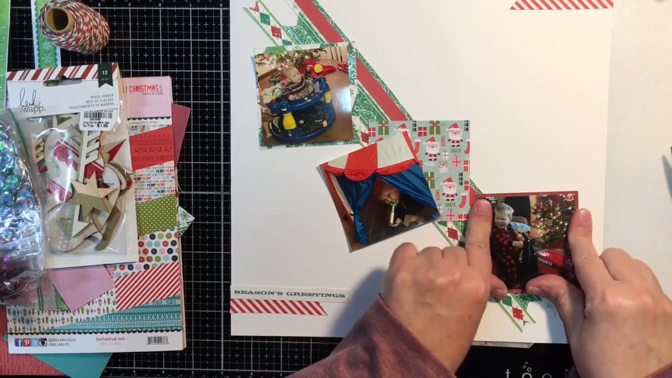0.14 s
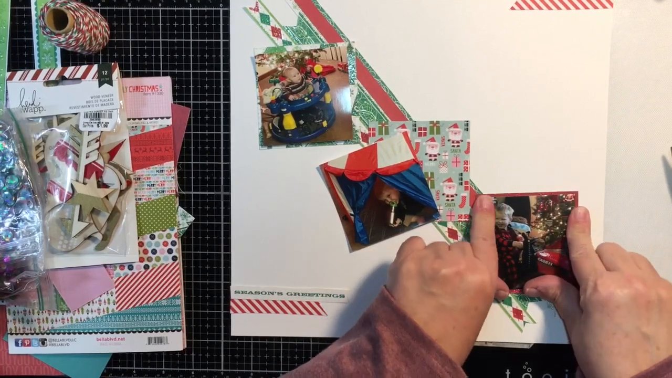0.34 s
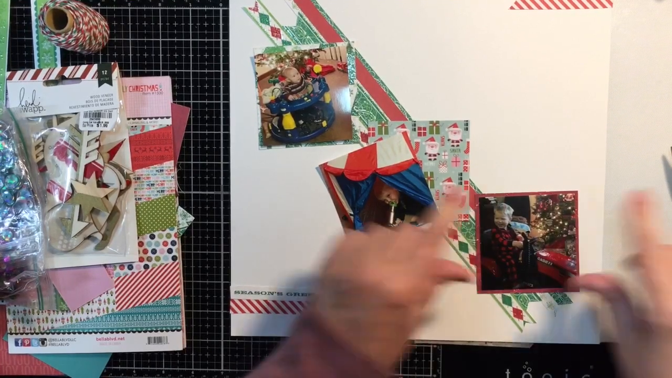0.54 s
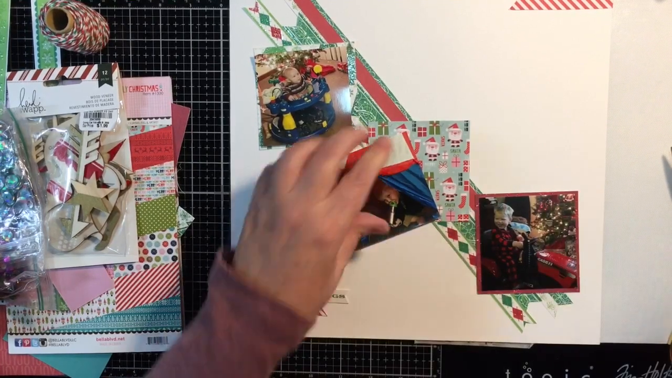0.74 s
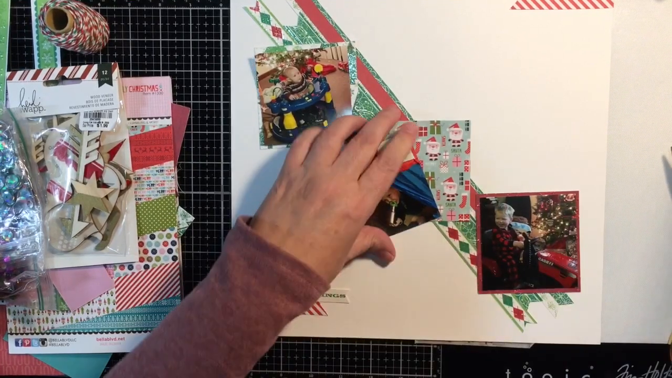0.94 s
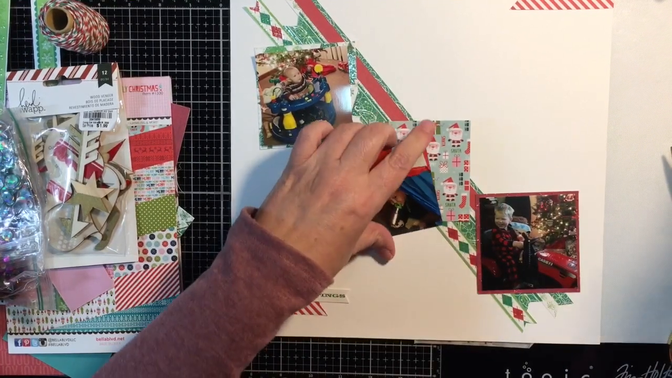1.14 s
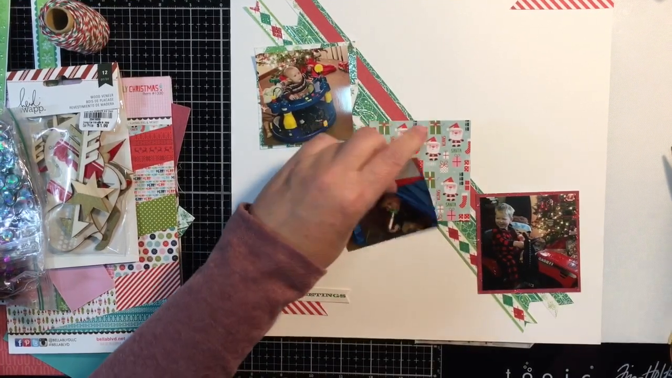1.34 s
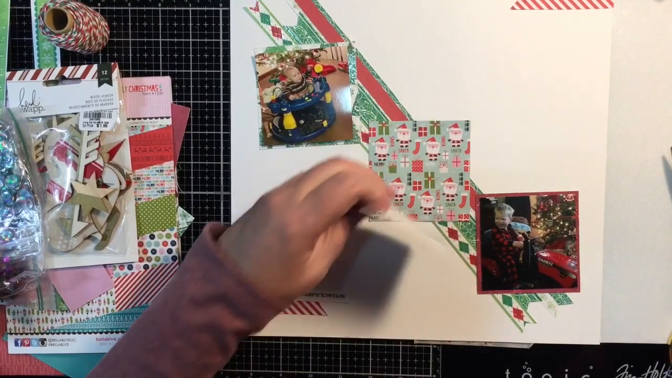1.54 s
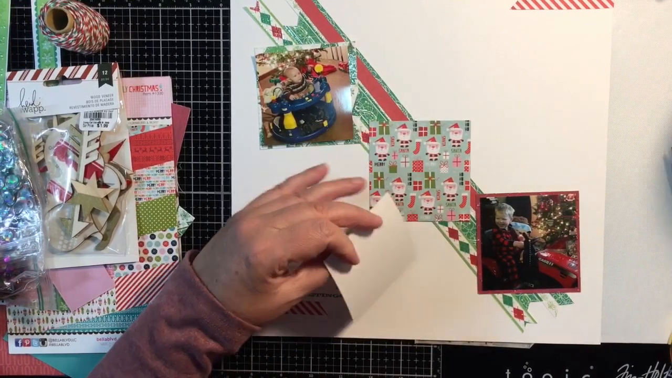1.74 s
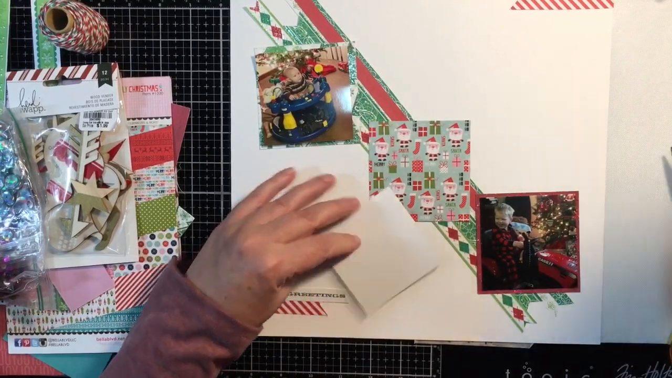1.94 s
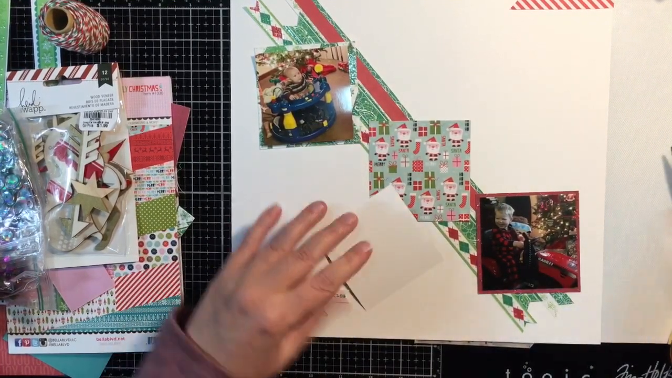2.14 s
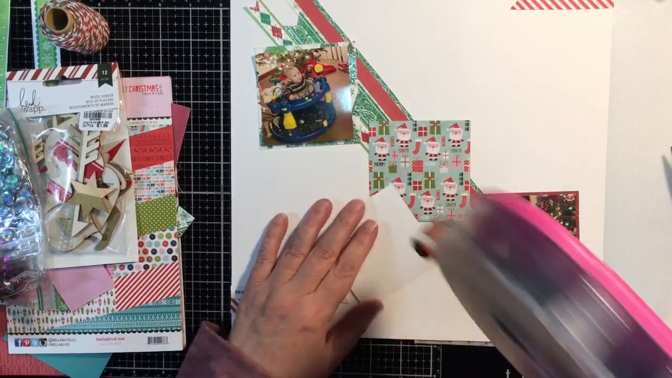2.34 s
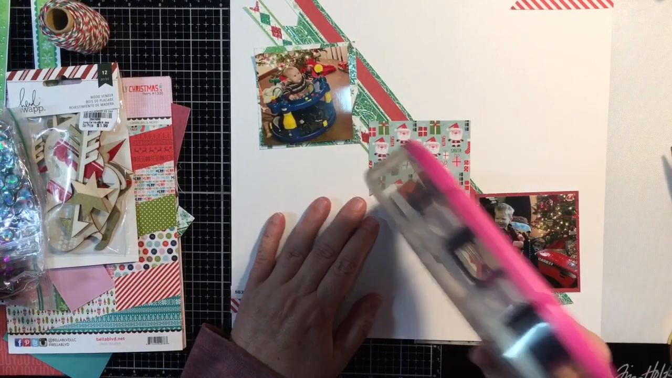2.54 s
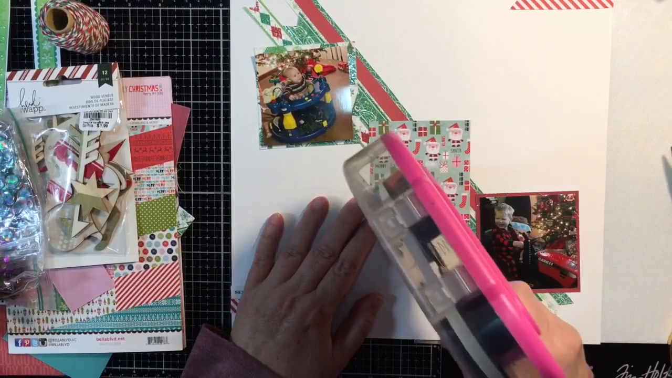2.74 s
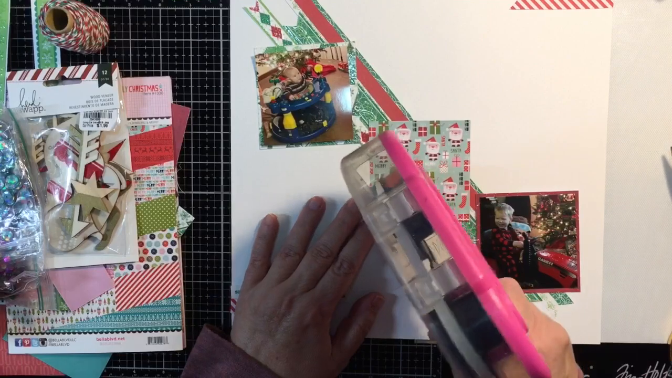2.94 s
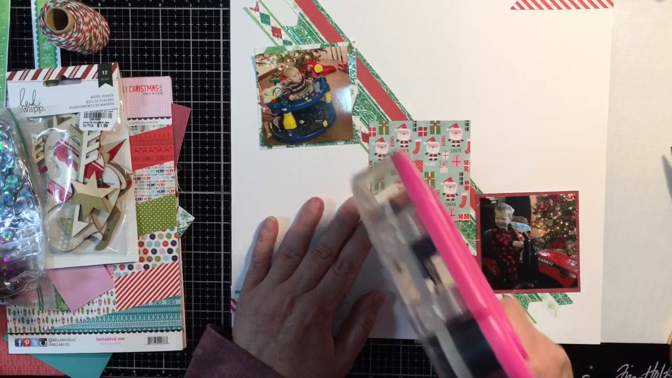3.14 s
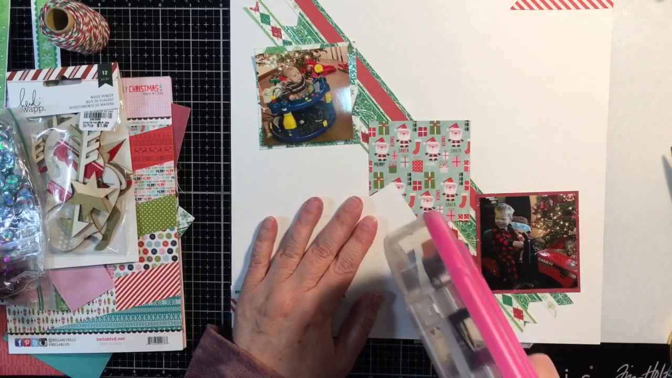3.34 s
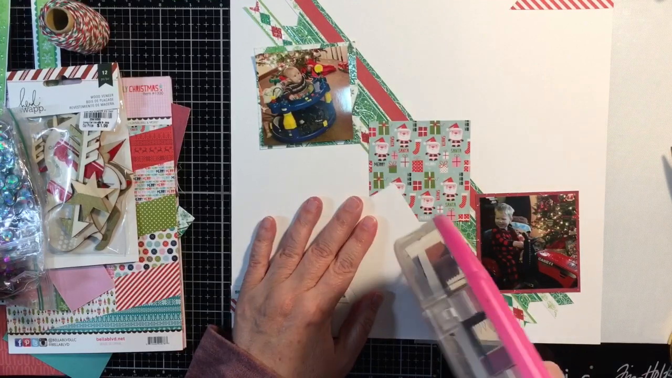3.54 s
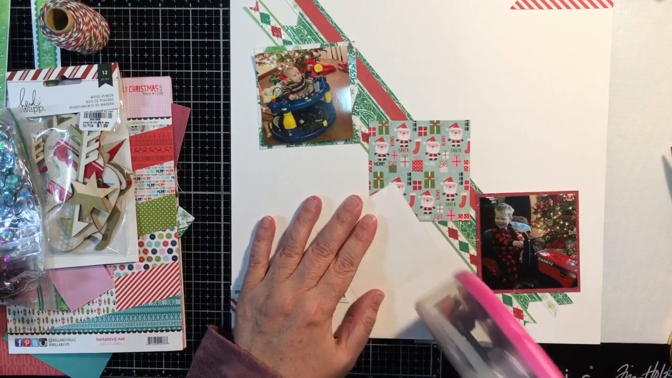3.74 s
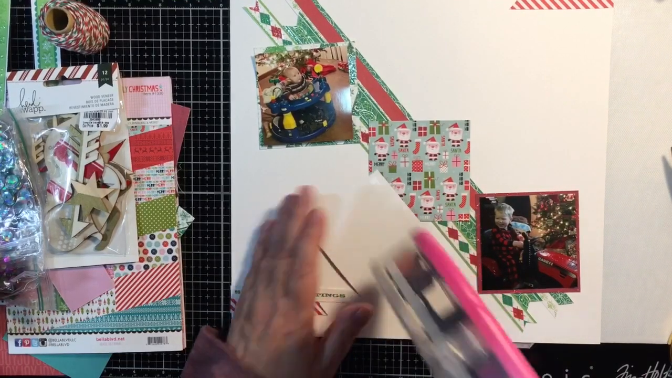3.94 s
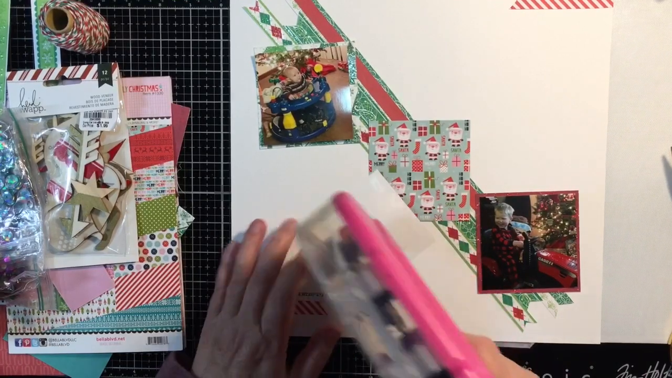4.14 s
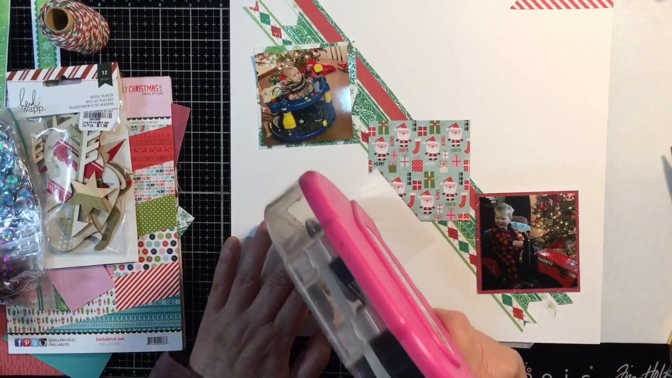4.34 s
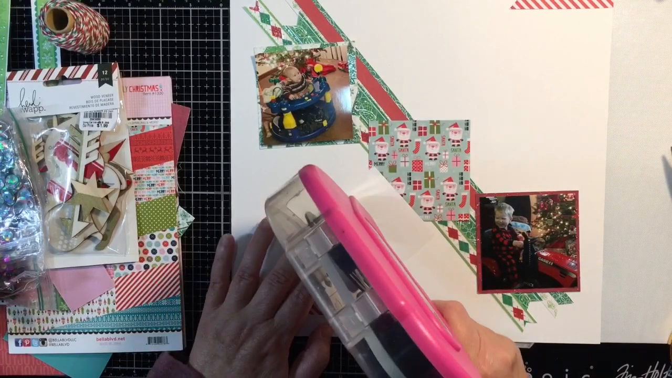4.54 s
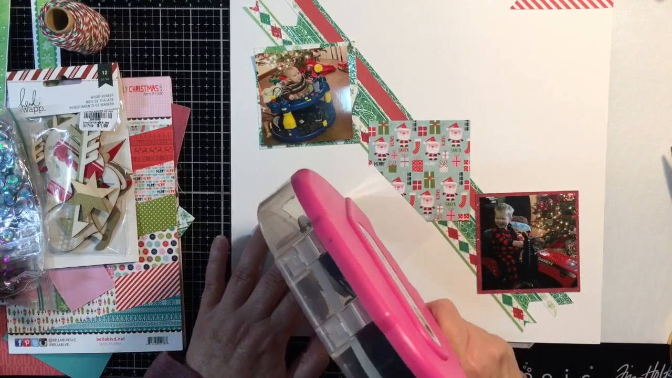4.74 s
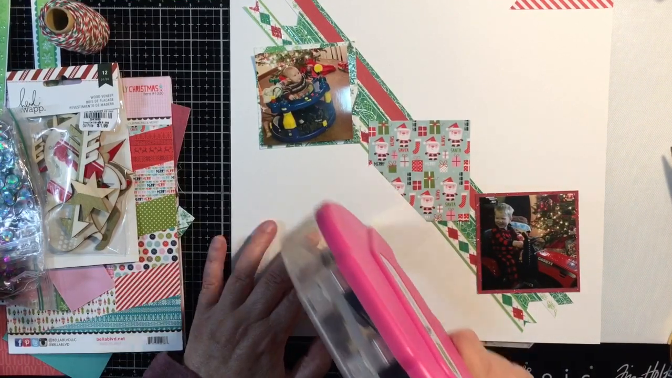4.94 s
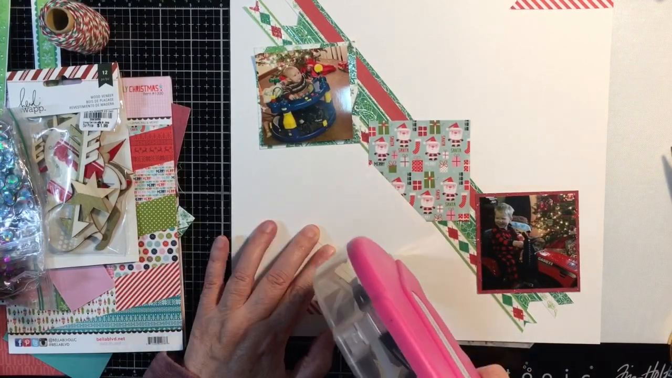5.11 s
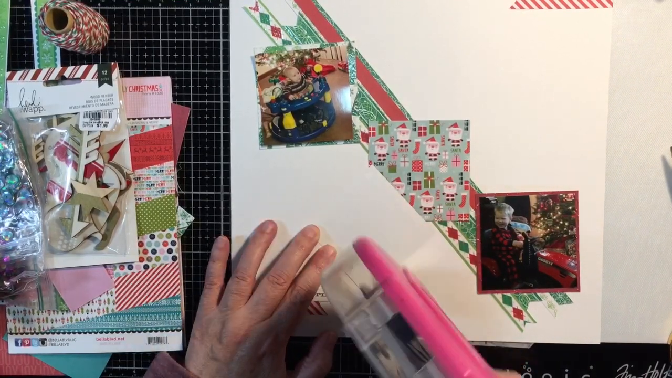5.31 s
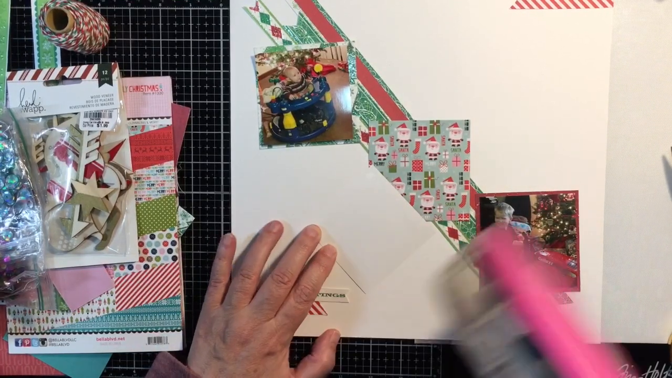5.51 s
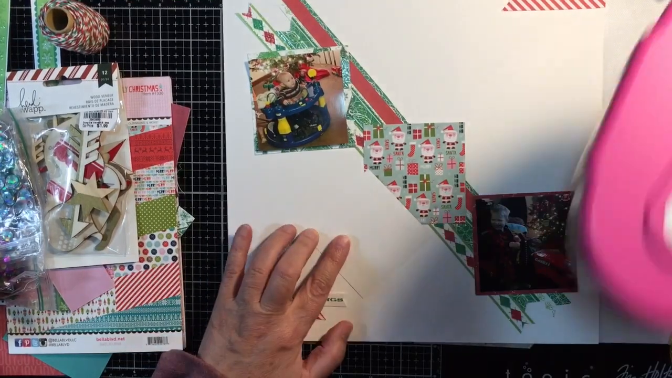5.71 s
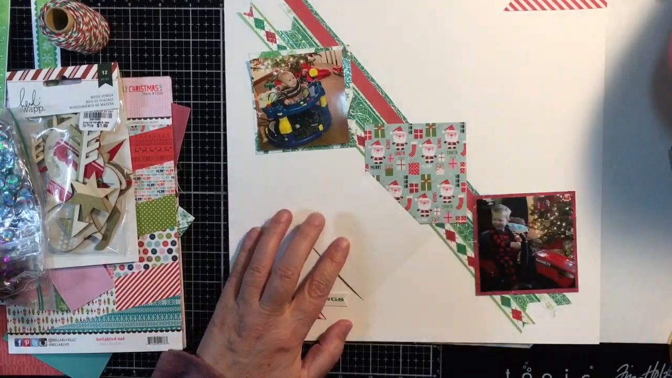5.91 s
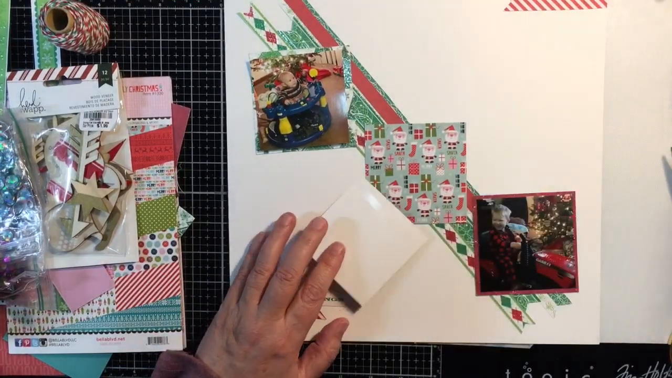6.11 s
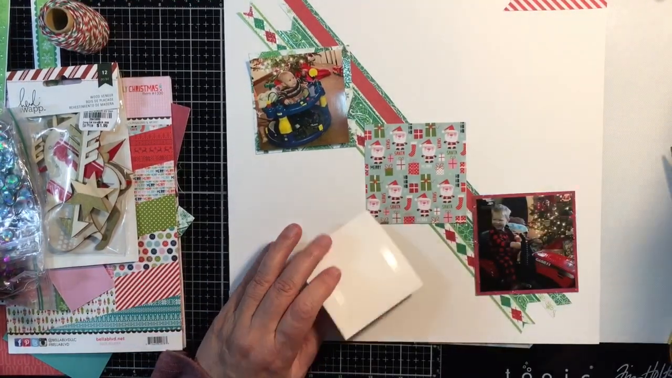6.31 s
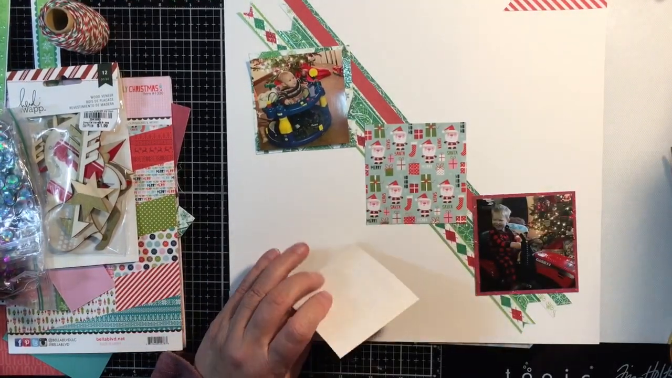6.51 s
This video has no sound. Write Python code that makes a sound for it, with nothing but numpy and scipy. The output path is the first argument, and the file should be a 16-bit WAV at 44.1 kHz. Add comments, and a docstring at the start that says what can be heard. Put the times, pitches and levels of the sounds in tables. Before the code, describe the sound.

Dry papery rubs and small flicks come first, over a faint low room hum. Then a plastic adhesive dispenser clatters onto paper, its reels juddering in a brief rasp, with hard knocks at the end. Another loud knock starts a shorter, weaker rasp that finishes with a springy click. Quiet handling leads to one heavy clunk on the tabletop. Close microphone, small room, short reverberation.

```python
"""A plastic tape runner knocks and is drawn across paper twice; its trigger snaps and it lands on the table.
Reels are random slips through case resonances, tape is hiss and ticks; blows are short noise bursts in modes.
A photo slides, flicks and taps on the page: fibre slips follow hand speed, and contacts ring the paper.
Low decaying sines shake the table top; finger rubs, echoes, a small room and steady air noise surround it."""
import sys
import numpy as np
from scipy import signal
from scipy.fft import rfft, irfft
from scipy.io import wavfile
from scipy.ndimage import uniform_filter1d

SR = 44100
rng = np.random.default_rng(int(sys.argv[2]) if len(sys.argv) > 2 else 0)


def generate_wav(sig):
    """Save sig (samples, or channels by samples) to the path in sys.argv[1] as 16-bit PCM at SR."""
    pcm = np.round(np.clip(np.atleast_2d(sig).T, -1, 1) * 32767).astype(np.int16)
    wavfile.write(sys.argv[1], SR, pcm)


N = 294147
TIME = np.arange(N) / SR
HZ = np.fft.rfftfreq(8192, 1 / SR)

# All level_db are source levels ahead of the mix; spectra are relative and get normalised.

# runner strokes: start_s, length_s, rumble_db, peel_db, swell_power (low = even, high = peaked)
STROKES = [(3.066, 0.469, -37, -48.5, 2.5), (4.892, 0.3, -39.5, -51.5, .7)]
# thickest adhesive threads snap: start_s, level_db
THREAD_SNAPS = [(3.236, -54), (3.352, -38), (3.448, -50.5), (3.471, -57.5)]
# reel spectrum: freq_hz, level_db
REEL_SPECTRUM = [(100, -32.5), (250, -18.5), (400, -8.5), (530, -1), (680, -2.5), (1000, -6), (1200, -2),
                 (1500, -18.5), (3100, -13.5), (5000, -26), (12000, -48.5)]
# loaded reel resonances, one list per stroke: freq_hz, width_hz, lift_db
REEL_MODES = [
    [(734, 340, -7), (1160, 480, 3), (2250, 780, 0.5)],
    [(503, 780, 8.5), (1743, 300, 8.5), (3110, 1700, 4.5)],
]
# plastic case resonances: freq_hz, width_hz, lift_db
CASE_MODES = [(483.7, 3.9, 7.5), (629, 47, 11.5), (842, 63, 5), (1180, 92, 1.5), (1517, 79, 1),
              (1855, 130, 3.5), (2290, 51, 2), (2880, 34, 11.5), (3613, 50, -5), (3840, 110, 3),
              (3985, 55, 5.5), (4474, 80, 0.5), (6740, 140, 1)]
# peeling tape spectrum: freq_hz, level_db
TAPE_SPECTRUM = [(500, -5), (2000, 6), (3500, -3), (6000, 1.5), (10000, 1.5), (15000, 2)]
STROKE_PEAK = 0.63  # share of stroke length at top speed
SURGE_S, SURGE_DB = 0.0638, 1.4  # reels bind once per turn: period, depth
PEEL_POWER = 1.2  # peel amplitude = drag ** this


def tape_strokes():
    """Reels judder in the case as tape peels off its liner in fizz and ticks; both follow hand speed."""
    # glue lets go in uneven slips: each a puff of tiny snaps and a jolt to the reels
    slip_count = np.cumsum(75 * flutter(90, 4)) / SR
    slip_db = 4 * np.clip(rng.standard_normal(N), -2, 2)[slip_count.astype(int)]
    slip_decay = np.exp(-(slip_count % 1) / 0.26)
    slips = unit(0.2 + amp(slip_db) * slip_decay)

    reels, peel = np.zeros(N), np.zeros(N)
    for (start_s, length_s, rumble_db, peel_db, swell_power), reel_modes in zip(STROKES, REEL_MODES):
        t = TIME - start_s
        drag = hand_speed(t, length_s, STROKE_PEAK) ** swell_power
        surge_db = SURGE_DB * np.cos(2 * np.pi * t / SURGE_S)
        jolts = grains(3500, 2.3) * unit(np.sqrt(slips))
        judder = amp(rumble_db + surge_db) * drag * jolts
        reels += colour(judder, body(REEL_SPECTRUM, CASE_MODES + reel_modes))
        peel += amp(peel_db) * drag ** PEEL_POWER

    crackle = peel * grains(7000, 2) * slips
    for start_s, level_db in THREAD_SNAPS:
        add(crackle, start_s, amp(level_db) * chatter(hold_s=0.001, t60_s=0.015))
    tape = colour(crackle, body(TAPE_SPECTRUM))
    return wander(reels, depth_db=4.5) + wander(tape, depth_db=2.5)


# case and mechanism knocks: start_s, level_db, sharp_db (top end)
KNOCKS = [(2.660, -41.5, -14), (2.794, -55.5, 10.5), (2.911, -49.5, 5), (2.920, -35, -1), (3.109, -52.5, 7),
          (3.128, -41, -10), (3.188, -50.5, -22), (3.320, -40, 3), (3.431, -27, -10.5), (3.578, -24.5, -6),
          (3.676, -50, 18), (4.287, -66.5, -10), (4.370, -68.5, -8), (4.526, -57, 2), (4.618, -60, 22),
          (4.664, -24, -7), (4.779, -49, -22), (4.950, -48.5, -12), (5.264, -42.5, -2), (5.295, -53, 3),
          (5.503, -52.5, -5), (5.661, -34.5, -16)]
# case spectrum: freq_hz, level_db
CASE_SPECTRUM = [(100, -32.5), (270, -11), (550, -13), (900, -5.5), (1900, -3), (3000, -10), (5000, -17),
                 (8000, -28), (15000, -42)]
# lighter knocks sound more hollow: low end at FIRM_DB, gain per dB below it
FIRM_DB, FIRM_LOW_DB, HOLLOW_PER_DB = -26.5, 3.5, 0.3605


def case_knocks():
    """Case and mechanism parts strike each other and ring the plastic shell."""
    knocks = KNOCKS + rattles(spread_db=2.5, sharp_db=0)
    return blows(knocks, body(CASE_SPECTRUM, CASE_MODES), hold_s=0.0036, t60_s=0.028,
                 low_db=FIRM_LOW_DB, low_per_db=HOLLOW_PER_DB)


# loose parts as the runner is carried off: (start_s, end_s), level at start, fade
RATTLE_SPAN_S, RATTLE_DB, RATTLE_FADE_DB_PER_S = (5.86, 6.18), -56, 54


def rattles(spread_db, sharp_db, count=6):
    """Loose parts give faint knocks at uneven times, dying away."""
    start_s, end_s = RATTLE_SPAN_S
    when, strength = rng.random((count, 2)).T
    after_s = (end_s - start_s) * (np.arange(count) + when) / count
    level_db = RATTLE_DB - RATTLE_FADE_DB_PER_S * after_s + spread_db * (2 * strength - 1)
    return [(start_s + s, db, sharp_db) for s, db in zip(after_s, level_db)]


# trigger snaps back: start_s, level_db, sharp_db (top end)
TRIGGER_SNAPS = [(5.358, -47, -6.5), (5.369, -35, -1), (5.374, -17.5, 3.5), (5.782, -31.5, 1)]
# trigger spring spectrum: freq_hz, level_db
SPRING_SPECTRUM = [(100, -44.5), (200, -16.5), (300, -16), (550, -8.5), (900, -2.5), (1900, -3.5),
                   (3000, -4), (5000, -12), (8000, -16.5), (15000, -26)]
# trigger resonances: freq_hz, width_hz, lift_db
TRIGGER_MODES = [(486, 32, 8.1), (785, 28, 4.5), (1310, 63, 8.4), (1780, 130, 11), (2300, 70, 3),
                 (2280, 88, 4.7), (2680, 100, 6.3), (3700, 150, 8.7), (3550, 70, 3.2), (4110, 100, 5.4),
                 (4560, 100, 3), (6730, 500, 4.1)]


def trigger_snaps():
    """The sprung trigger strikes its stop; loose parts shift as it rings."""
    snaps = blows(TRIGGER_SNAPS, body(SPRING_SPECTRUM, TRIGGER_MODES), hold_s=0.0037, t60_s=0.032,
                  low_db=6, low_per_db=-0.07)
    return wander(snaps, depth_db=2)


# runner meets table, edge first, then whole weight: start_s, level_db, sharp_db (top end)
LANDINGS = [(6.385, -38.5, 1), (6.482, -15, 7)]
# table top spectrum: freq_hz, level_db
TABLE_SPECTRUM = [(30, -31), (60, -13), (150, 0), (280, -8.5), (500, -6), (1000, -6), (1800, -5.5),
                  (3000, -10), (5000, -21), (8000, -30), (15000, -43.5)]
# table top resonances: freq_hz, width_hz, lift_db
TABLE_MODES = [(381, 26, 9.6), (452, 29, 8.9), (656.4, 20, 12.4), (765, 20, 11.5), (1100, 30, 3.1),
               (1240, 57, 6.1), (1466, 73, 7.8), (1696, 88, 6.2), (1820, 53, 10), (2370, 39, 2.5),
               (2380, 83, 4.7), (2670, 67, 3.7), (3270, 90, 6.9)]


def table_landing():
    """The runner's weight strikes the table top and rings its modes."""
    hits = LANDINGS + bounces(sharp_db=1.5)
    return blows(hits, body(TABLE_SPECTRUM, TABLE_MODES), hold_s=0.0063, t60_s=0.035,
                 low_db=2.2, low_per_db=0.25)


# rocking to rest: spacing, first bounce relative to landing, loss per further bounce
BOUNCE_S, BOUNCE_DB, BOUNCE_LOSS_DB = 0.02, -15, 5


def bounces(sharp_db, count=3):
    """Each landing is followed by ever weaker bounces."""
    return [(s + (k + 1) * BOUNCE_S, db + BOUNCE_DB - k * BOUNCE_LOSS_DB, sharp_db)
            for s, db, _ in LANDINGS for k in range(count)]


# pushes that shake the table: start_s, level_db, rise_s
THUMPS = [(0.159, -49.5, 0.019), (1.92, -54, 0.0048), (2.479, -52, .03), (2.931, -32.5, .011),
          (3.438, -31, 0.0023), (3.596, -39, 0.041), (4.534, -37, 0.0057), (4.669, -32.5, 0.0046),
          (4.751, -46.5, .014), (5.229, -49, .02), (6.482, -23.5, 0.0023)]
# table low modes: freq_hz, level_db, t60_s
SWAY_MODES = [(56, -1.5, 0.26), (78.7, -7, 0.37), (119.6, 6, 0.18), (162, -6.5, 0.15), (206, -14.5, 0.18),
              (227.5, -12, 0.126)]


def table_sway():
    """The table top swings in its low modes; quick pushes favour the higher ones, slow leans the lowest."""
    out, t = np.zeros(N), np.arange(SR // 2) / SR
    for start_s, level_db, rise_s in THUMPS:
        tilt_db_per_octave = 3 * np.log2(0.0052 / rise_s)
        detune = 1 + .03 * rng.uniform(-1, 1, len(SWAY_MODES))  # hand's weight shifts the modes
        swing = np.zeros(len(t))
        for (hz, mode_db, t60_s), ratio in zip(SWAY_MODES, detune):
            decay_db = mode_db + tilt_db_per_octave * np.log2(hz / 110) - 60 * t / t60_s
            swing += amp(decay_db) * np.sin(2 * np.pi * hz * ratio * t)
        add(out, start_s, amp(level_db + 1.5) * swing * (1 - np.exp(-t / rise_s)))
    return out


# paper and fingers slide over paper: start_s, length_s, level_db, bright_db
SLIDES = [(0, 0.11, -51, -8.5), (0.489, 0.07, -55, 3), (0.955, 0.056, -59, -6), (1.012, .16, -56.5, -3),
          (1.206, 0.18, -48, -19.5), (1.319, 0.034, -38, -20), (1.342, 0.088, -42.5, -10),
          (1.403, 0.11, -43.5, -13), (1.53, 0.096, -40.5, -9.5), (1.56, .22, -67.5, 9),
          (1.89, 0.13, -55, -8.5), (2.002, 0.063, -39.5, -26), (2.21, .12, -49, -7.5),
          (2.398, 0.075, -44, -12), (3.86, 0.12, -60, 2.5), (3.936, 0.042, -47.5, -2),
          (3.983, 0.044, -47, -10.5), (3.988, 0.23, -77, 8), (5.668, 0.12, -61, 10),
          (5.795, 0.78, -62.5, -16.5), (6.376, 0.3, -48.5, -16), (6.612, .1, -55.5, -3.5)]
# turned photo drops at full speed and skids to rest: start_s, length_s, level_db, bright_db
SKID = (1.833, .115, -42, -1)
# paper spectrum: freq_hz, level_db
PAPER_SPECTRUM = [(300, -18.5), (1000, -4), (2000, -2), (3000, -1), (4500, 2), (8000, 3.5), (15000, -2)]
# paper resonances: freq_hz, width_hz, lift_db
PAPER_MODES = [(2780, 370, 9.1), (3370, 1100, 3.1), (4070, 300, 3.3), (6150, 800, 5.3)]
SLIDE_PEAK, SLIDE_POWER = 0.52, 2.32  # share of length at top speed; hiss = speed ** power


def paper_slides():
    """Pushed paper hiss swells and fades; the dropped photo starts almost at once."""
    out, fibres = np.zeros(N), grains(14000, 4.9)
    for row in SLIDES:
        add(out, *slide(fibres, *row, peak=SLIDE_PEAK))
    add(out, *slide(fibres, *SKID, peak=0.018))
    return wander(out, depth_db=3.5) * flutter(70, 1.5)


def slide(fibres, start_s, length_s, level_db, bright_db, peak):
    """Fibres catch and let go in a fine hiss that swells with speed."""
    during = (TIME >= start_s) & (TIME < start_s + length_s + .05)
    speed = hand_speed(TIME[during] - start_s, length_s, peak)
    catches = fibres[during] * speed ** SLIDE_POWER
    response = body(PAPER_SPECTRUM, PAPER_MODES) * shelves(0, bright_db)
    return start_s, amp(level_db) * colour(catches, response)


# stiff photo taps the page: start_s, level_db, sharp_db (top end)
PHOTO_TAPS = [(1.519, -44.5, -5), (2.277, -46.5, 7), (2.283, -40, -1), (2.325, -42.5, -20),
              (2.429, -41.5, -25), (2.474, -43.5, -19)]
# photo edge flicks off a fingernail or the page: start_s, level_db, sharp_db (top end)
PHOTO_FLICKS = [(1.834, -50.5, 4), (2.019, -42, -19.5), (2.023, -43, -39), (2.044, -43.5, -4),
                (2.053, -56, 3), (2.070, -41, 0.5), (2.075, -40.5, -7.5), (2.432, -41.5, -11.5)]
# photo spectrum: freq_hz, level_db
PHOTO_SPECTRUM = [(100, -21), (300, -11), (700, 2.5), (1300, 0), (2800, -5.5), (5000, -9.5), (9000, -25),
                  (15000, -28)]
# photo resonances: freq_hz, width_hz, lift_db
PHOTO_MODES = [(248, 58, 15.3), (584, 70, 4.6), (870, 210, 4.5), (1520, 300, 6.3), (2304, 97, 12.2),
               (3200, 160, 3)]
# flicked edge resonance: freq_hz, width_hz, lift_db
EDGE_MODES = [(3120, 220, 15)]


def photo_contacts():
    """Taps ring the stiff sheet; flicks are shorter and ring its edge."""
    taps = blows(PHOTO_TAPS, body(PHOTO_SPECTRUM, PHOTO_MODES), hold_s=0.0028, t60_s=0.024, low_db=7.5)
    flicks = blows(PHOTO_FLICKS, body(PAPER_SPECTRUM, PAPER_MODES + EDGE_MODES), hold_s=0.00023,
                   t60_s=0.02, low_db=6.0)
    return taps + flicks


# fingers rub the hollow case and page: middle_s, level_db, half_length_s, resonance_hz
RUBS = [(0.102, -54.5, 0.019, 610), (.41, -70, 0.031, 600), (0.499, -48, 0.007, 525),
        (0.985, -57.5, 0.012, 604), (1.358, -62, 0.22, 260), (1.531, -44, 0.0087, 760),
        (1.638, -62, 0.17, 940), (1.841, -52, 0.011, 623), (2.12, -55, 0.011, 673),
        (2.72, -64.5, 0.84, 1190), (3.689, -40.5, 0.011, 670), (3.912, -58, 0.054, 650),
        (4.845, -51.5, 0.12, 501), (5.501, -47.5, 0.039, 700), (5.622, -55, 0.051, 248),
        (5.72, -52, 0.086, 760), (5.955, -62.5, 0.24, 675), (6.434, -37.5, 0.048, 440),
        (6.595, -43, 0.078, 420)]
# hollow body spectrum: freq_hz, level_db
HOLLOW_SPECTRUM = [(100, -11), (250, -6), (400, -12), (660, -4), (1000, -8.5), (1700, -9.5), (3000, -17),
                   (8000, -36.5)]


def handling():
    """Rubs stir a hollow resonance set by where the fingers lie; the skin grips unevenly."""
    out, skin = np.zeros(N), grains(1500, 0.95) * flutter(55, 3.4)
    for middle_s, level_db, half_s, hz in RUBS + touches(spread_db=3.5, spread_octaves=.45):
        during = abs(TIME - middle_s) < 2 * half_s + .05
        t = TIME[during]
        rub = np.exp(-((t - middle_s) / half_s) ** 2) * skin[during]
        add(out, t[0], amp(level_db) * colour(rub, body(HOLLOW_SPECTRUM, [(hz, 80, 17)])))
    return out


# random touches, centre values: level_db, half_length_s, resonance_hz
TOUCH = (-64, 0.0067, 484)


def touches(spread_db, spread_octaves, count=28):
    """Restless hands: light contacts scattered in time, strength and pitch."""
    level_db, half_s, hz = TOUCH
    rows = []
    for k, (when, force, place) in enumerate(rng.random((count, 3))):
        middle_s = TIME[-1] * (k + when) / count
        pitch_ratio = 2 ** (spread_octaves * (2 * place - 1))
        rows.append((middle_s, level_db + spread_db * (2 * force - 1), half_s, hz * pitch_ratio))
    return rows


# nearby surface reflections: delay_s, level_db
ECHOES = [(.0016, -20), (.0040, -21.5), (.0077, -20), (.0122, -23.5), (.0163, -15.5)]


def nearby(x):
    """Early echoes comb the sound; the treble scatters away."""
    dull = signal.sosfilt(signal.butter(1, 6000, fs=SR, output="sos"), x)
    out = x.copy()
    for delay_s, level_db in ECHOES:
        add(out, delay_s, amp(level_db) * dull)
    return out


# room decay: freq_hz, t60_s
ROOM_DECAY = [(100, 0.4), (500, 0.29), (1500, 0.21), (4000, 0.16), (8000, 0.15), (15000, 0.13)]


def room(x):
    """Many weak reflections, each band dying at its own speed."""
    count = SR // 2
    taps = rng.standard_normal(count) * (rng.random(count) < .15) * (np.arange(count) > .007 * SR)
    hz, t, z = signal.stft(taps, SR, nperseg=256)
    decay = amp(-60 * t / read(ROOM_DECAY, hz)[:, None])
    tail = signal.istft(z * decay, SR, nperseg=256)[1]
    return signal.fftconvolve(x, tail / np.linalg.norm(tail))[:N]


# room noise spectrum: freq_hz, level_db
AIR_SPECTRUM = [(20, -10), (40, -13.5), (60, 13), (85, -1.5), (120, 6), (200, -5), (400, -12.5),
                (600, -13.5), (1000, -16.5), (3000, -19), (8000, -25), (15000, -30.5)]


def room_air():
    """Steady room noise: white noise shaped by a fixed spectrum."""
    return amp(-63.0) * colour(rng.standard_normal(N), body(AIR_SPECTRUM))


def blows(rows, response, hold_s, t60_s, low_db, low_per_db=0):
    """Each blow rings the same object, coloured by how hard the contact is."""
    out = np.zeros(N)
    for start_s, level_db, sharp_db in rows:
        contact = shelves(low_db + low_per_db * (FIRM_DB - level_db), sharp_db)
        burst = np.pad(chatter(hold_s, t60_s), (0, 2048))  # room to ring out
        add(out, start_s, amp(level_db) * colour(burst, response * contact))
    return out


def chatter(hold_s, t60_s, count=4096, size=45):
    """Parts buzz together for a few ms, then settle: flat spectrum, rms 1 over 20 ms."""
    t = np.arange(count) / SR
    shape = np.minimum(t / 0.00076, 1) * amp(-60 * np.maximum(t - hold_s, 0) / t60_s)
    z = rfft(rng.standard_normal(count) * shape)
    z /= np.sqrt(uniform_filter1d(abs(z) ** 2, size))  # flatten
    burst = irfft(z) * (t < t[-1] / 2)
    return burst * np.sqrt(.02 * SR / np.sum(burst ** 2))


def hand_speed(t, length_s, peak):
    """Hand speed, 0 to 1: gathers pace up to share peak of the length, then slows to rest."""
    knots = [0, np.clip(peak, .01, .99), 1]
    return np.sin(np.pi / 2 * np.interp(t / length_s, knots, [0, 1, 0]))


def grains(per_s, spread_db, count=N):
    """Random tiny slips, mostly small, a few large; rms 1."""
    size = amp(spread_db * np.minimum(rng.exponential(1, count), 3.5))
    sign = rng.choice([-1, 1], count)
    return unit(size * sign * (rng.random(count) < per_s / SR))


def flutter(rate_hz, depth_db):
    """Uneven grip: a randomly wandering gain, rms 1."""
    knots_s = np.arange(0, TIME[-1] + 1, 1 / rate_hz)
    drift = np.clip(rng.standard_normal(N)[:len(knots_s)], -2, 2)
    return unit(amp(depth_db * np.interp(TIME, knots_s, drift)))


def wander(x, depth_db, size=5):
    """Shifting contact favours now one resonance, now another: random time-frequency gain."""
    z = signal.stft(x, SR, nperseg=512, noverlap=384)[2]
    patches = uniform_filter1d(rng.standard_normal(z.shape), size, 0)
    patches = unit(uniform_filter1d(patches, 2 * size, 1))
    gain = unit(amp(depth_db * np.clip(patches, -2, 2)))
    return signal.istft(z * gain, SR, nperseg=512, noverlap=384)[1][:len(x)]


def body(spectrum, modes=()):
    """Frequency response of an object, power 1: a broad shape lifted or cut by its resonances."""
    lift = sum((amp(db) ** 2 - 1) / (1 + (2 * (HZ - hz) / width_hz) ** 2) for hz, width_hz, db in modes)
    return unit(amp(read(spectrum)) * np.sqrt(np.maximum(1 + lift, .1)))


def shelves(low_db, high_db):
    """A soft contact favours the lows, a hard one the highs."""
    return amp(read([(750, low_db), (1250, 0.012), (2800, 0.018), (6500, high_db)]))


def colour(x, gain):
    """Minimum-phase filter: resonances ring after the push, never before."""
    log_gain = np.log(np.maximum(np.r_[gain, gain[-2:0:-1]], 1e-5))
    ring = np.fft.ifft(np.exp(np.conj(signal.hilbert(log_gain)))).real[:4096]
    return signal.oaconvolve(x, ring)[:len(x)]


def read(points, hz=HZ):
    """Reads a table on a log-frequency axis."""
    f, value = np.transpose(points)
    return np.interp(np.log(hz + 1), np.log(f + 1), value)


def amp(db):
    """Decibels to gain."""
    return 10 ** (np.asarray(db) / 20)


def unit(x):
    """Scales to rms 1."""
    return x / np.sqrt(np.mean(x ** 2) + 1e-20)


def add(mix, start_s, sound):
    """Mixes a sound in at start_s."""
    part = mix[max(round(start_s * SR), 0):][:len(sound)]
    part += sound[:len(part)]


def scene():
    """Runner, table and paper in a quiet room."""
    runner = tape_strokes() + case_knocks() + trigger_snaps()
    paper = paper_slides() + photo_contacts()
    near = amp(-0.94) * nearby(runner + paper + handling())
    landing = table_landing()
    reverb = amp(-13.5) * (room(near) + room(landing))
    return (near + landing + table_sway() + reverb + room_air())[None]


def record(dry):
    """Microphone bass roll-off and recorder band limit."""
    thin = signal.sosfilt(signal.butter(3, 42, "high", fs=SR, output="sos"), dry)
    band_limit = signal.firwin(511, 16200, window=("kaiser", 9), fs=SR)
    return signal.oaconvolve(thin, band_limit[None], "same")


dry = scene()
out = record(dry)
generate_wav(out)
```